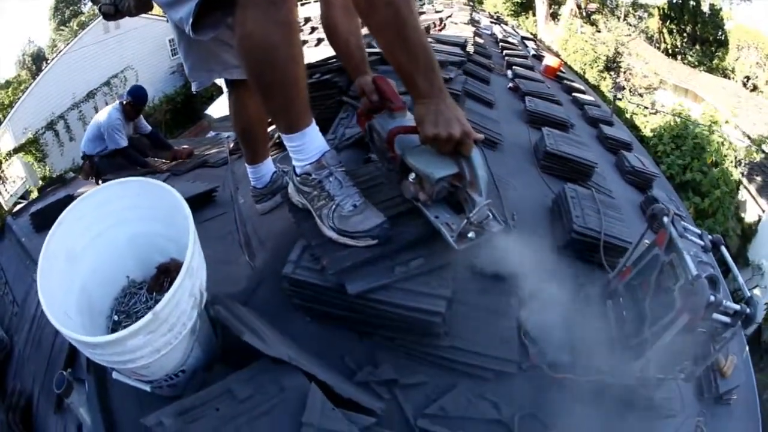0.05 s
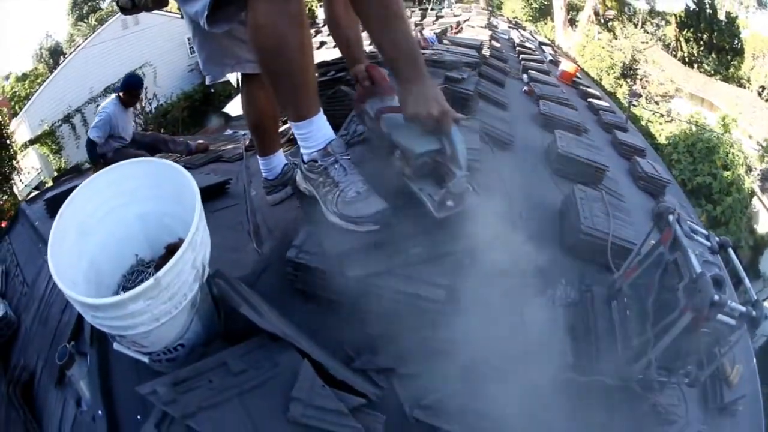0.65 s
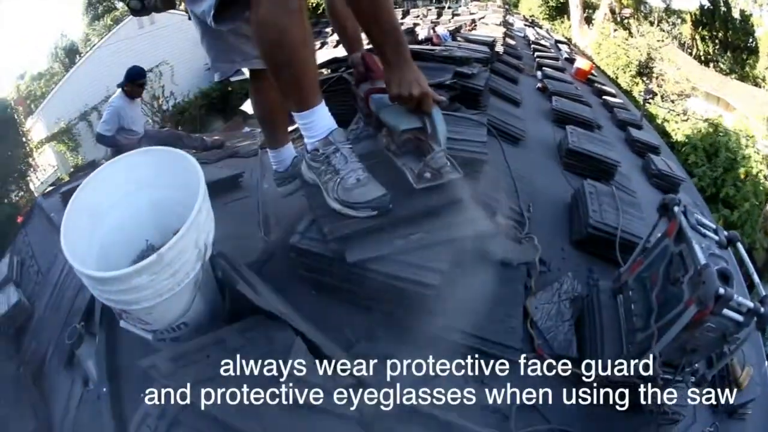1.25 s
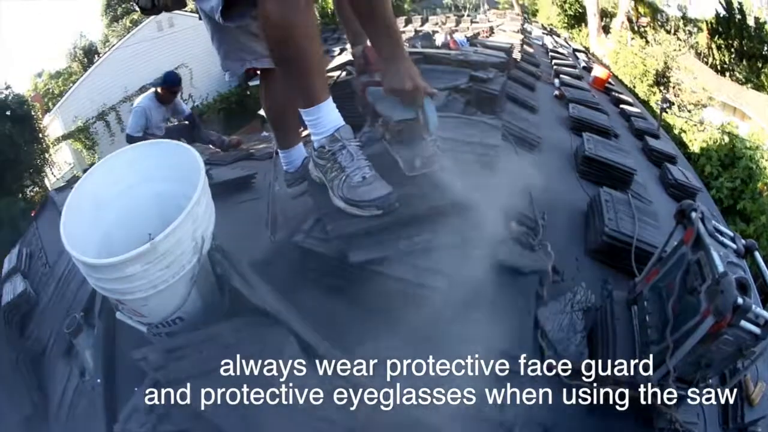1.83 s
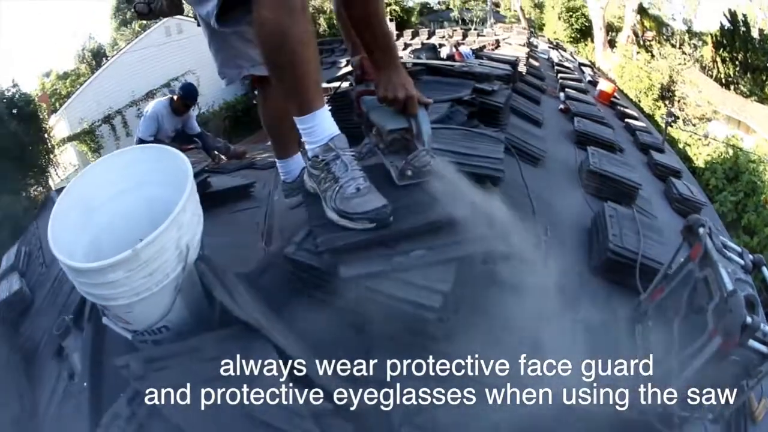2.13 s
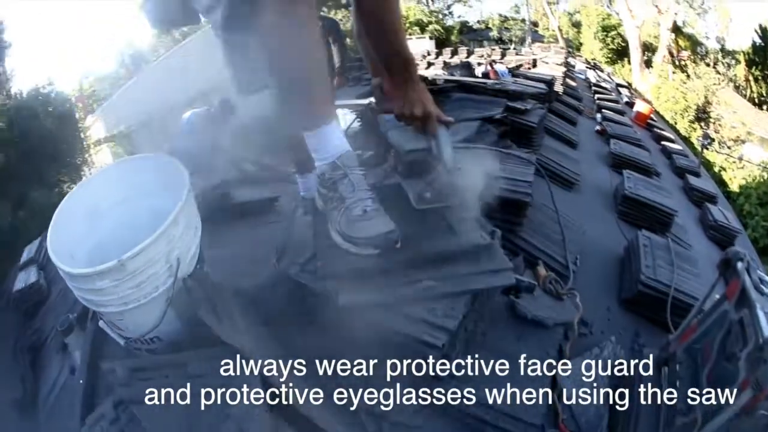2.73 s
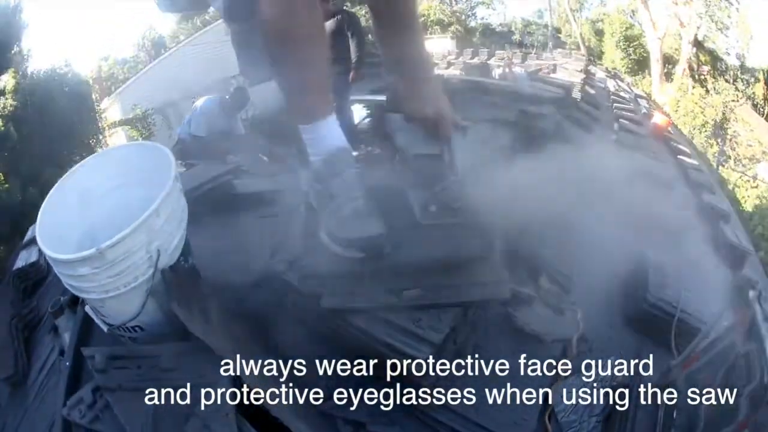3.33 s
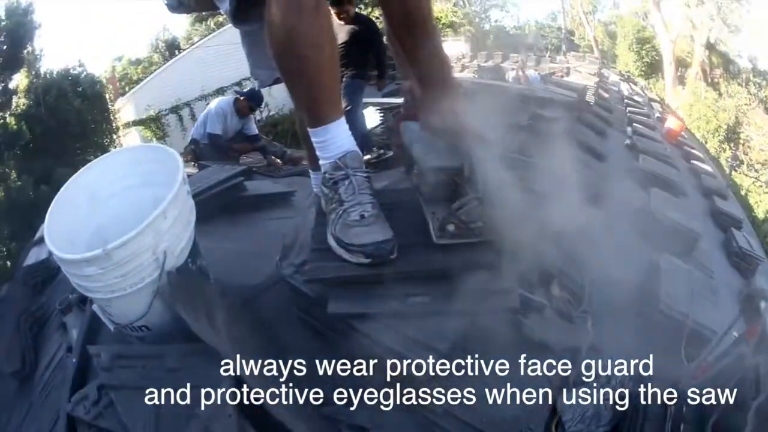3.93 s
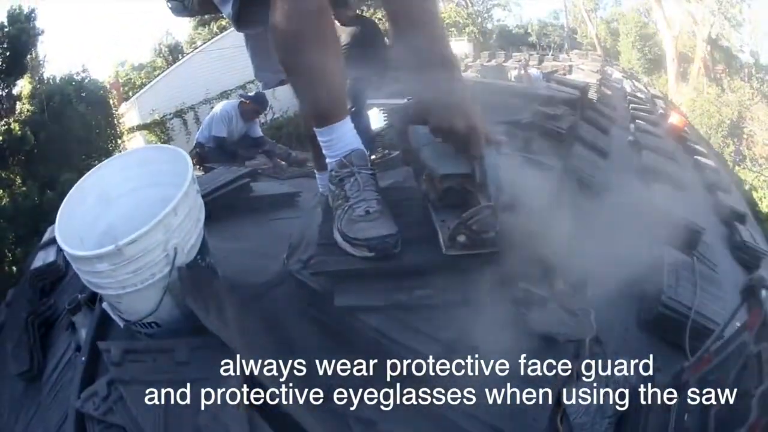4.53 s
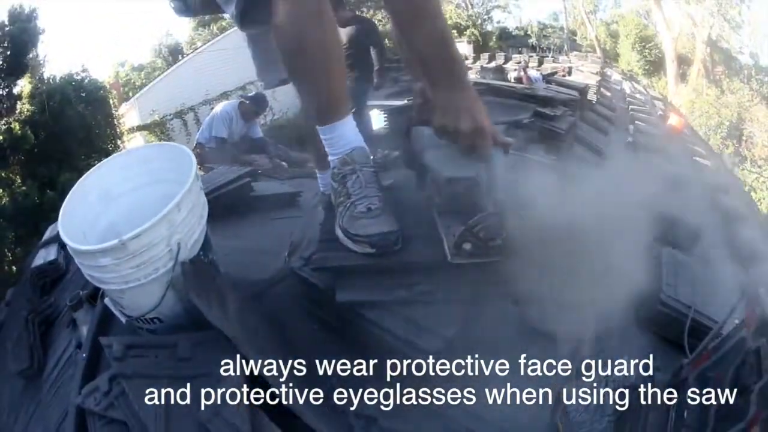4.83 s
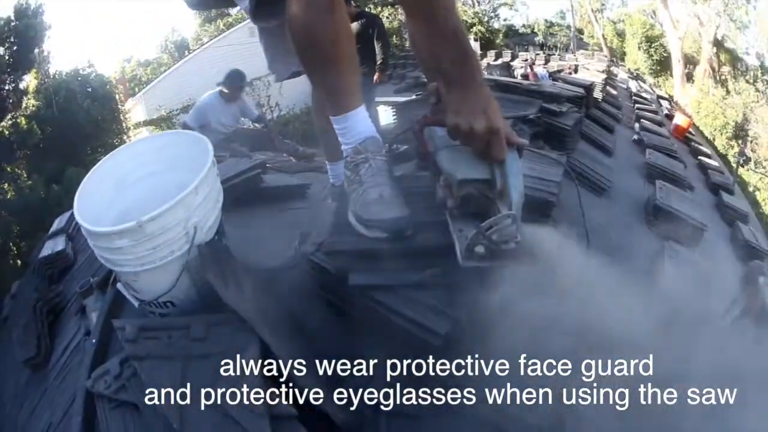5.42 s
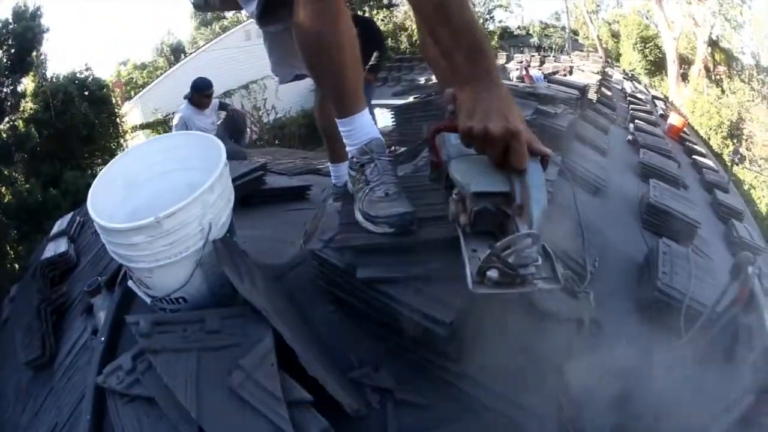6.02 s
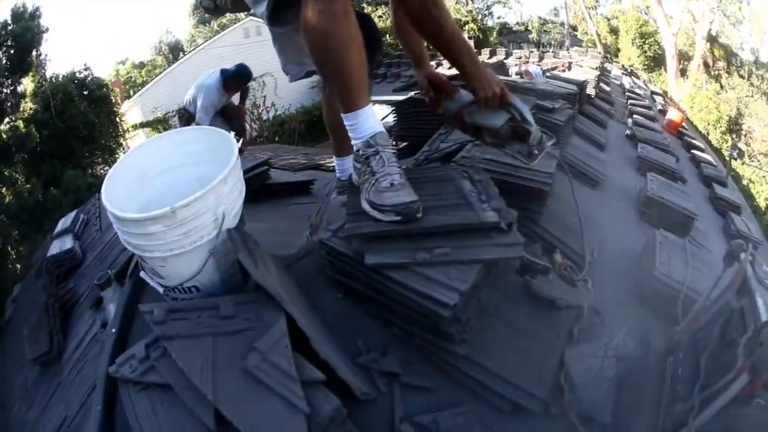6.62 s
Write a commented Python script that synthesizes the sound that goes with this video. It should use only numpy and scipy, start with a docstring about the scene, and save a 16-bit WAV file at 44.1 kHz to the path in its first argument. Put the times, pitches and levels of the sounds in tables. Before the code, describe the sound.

Outdoors, a circular saw grinds steadily through concrete tile, its piercing metallic shriek distorting the nearby microphone a little. Gritty rasping and wavering high tones run through the cut, broken by short, rough stutters as the blade catches. A few soft, dull thumps and low rumbles sit below. Finally the grinding stops, leaving rushing motor air and a whine that falls in pitch.

```python
"""Circular saw cutting a roof tile

A handheld saw's diamond blade cuts a concrete tile outdoors. Grit scrapes the kerf and rings the steel
disc, which sings now and then; the rim buzzes, sags under load and jams briefly. The blade comes free,
the trigger is let go and the motor whines down. The shriek overloads the microphone. Low rumbles and
short, dull thumps sound under the cut."""
import sys
import numpy as np
from scipy import signal
from scipy.fft import rfft, irfft, next_fast_len
from scipy.io import wavfile

SR = 44100
rng = np.random.default_rng(int(sys.argv[2]) if len(sys.argv) > 2 else 0)


def int16_out(signal):
    """Quantize to a 16-bit WAV file."""
    q = np.round(np.clip(np.atleast_2d(signal).T, -1, 1) * 32767)
    wavfile.write(sys.argv[1], SR, q.astype(np.int16))


N = 293997
TIME = np.arange(N) / SR
# the disc sinks in, reaches the far edge, is through, grazes the kerf, is lifted
SINK_S, EDGE_S, THROUGH_S, GRAZE_S, LIFT_S = 1.54, 5.42, 5.65, 5.85, 5.87


def undb(db):
    """Decibels to gain."""
    return 10 ** (np.asarray(db) / 20)


def unit(x):
    """Scale to rms 1."""
    return x / np.sqrt(np.mean(x ** 2))


def curve(table):
    """Join (time [s], value) points by straight lines."""
    return np.interp(TIME, *np.transpose(table))


def ramp(start_s, end_s):
    """Linear rise from 0 to 1."""
    return np.clip((TIME - start_s) / (end_s - start_s), 0, 1)


def since(start_s):
    """Seconds elapsed; 0 before the start."""
    return np.maximum(TIME - start_s, 0)


def swell(start_s, end_s, edge):
    """Rise and fall, each over the share `edge` of the span; one already under way only falls."""
    place = (TIME - start_s) / (end_s - start_s)
    rise = place if start_s > .02 else 1
    return np.clip(np.minimum(rise, 1 - place) / edge, 0, 1)


def walk(rate_hz):
    """Random drift, rate_hz new values a second; rms 1."""
    values = rng.standard_normal(4096)
    return unit(np.interp(TIME * rate_hz, np.arange(len(values)), values))


def colour(x, points):
    """Filter by (frequency [Hz], gain [dB]) points; rms 1."""
    hz, db = np.transpose(points)
    size = next_fast_len(N, True)
    bins_hz = np.maximum(np.arange(size // 2 + 1) * SR / size, 1)
    gain = undb(np.interp(np.log(bins_hz), np.log(hz), db))
    return unit(irfft(rfft(x, size) * gain, size)[:N])


def ring(x, hz, width_hz):
    """One damped mode driven by x; rms 1."""
    return unit(signal.lfilter(*signal.iirpeak(hz, hz / width_hz, SR), x))


def scrape(turns, wobble_db):
    """Grit impacts of uneven size; the disc runs out of true and bites harder once a turn."""
    return rng.standard_normal(N) * undb(wobble_db * np.sin(2 * np.pi * turns) + 1.5 * walk(400))


def rim_pattern(turns, points=768):
    """The same diamonds meet the tile every turn, so part of the scrape repeats."""
    marks = signal.resample(rng.standard_normal(points), 8 * points)
    return unit(np.interp(turns % 1, np.linspace(0, 1, len(marks)), marks))


def blade(bite, depth, wander_db=1.83, flutter_db=2.0, kerf_damping=1.66):
    """Disc modes waver as the contact point moves; the kerf walls damp them and shift their balance."""
    # steel disc modes: (frequency [Hz], free width [Hz], shallow level [dB], buried level [dB])
    modes = [(630, 29, -41.5, -49.5), (1138, 14, -41.5, -52), (1282, 56, -37.5, -44), (1912, 87, -30, -36),
             (2592, 157, -31, -26.5), (3165, 89, -26.5, -38), (3457, 32, -29, -31), (4045, 150, -28.5, -24),
             (4219, 30, -31, -25.5), (4480, 63, -26.5, -29.5), (4740, 47, -26.5, -31), (5097, 32, -26, -30),
             (5330, 24, -31, -44), (5591, 71, -23, -20.5), (6110, 66, -25, -28.5), (6294, 77, -29.5, -24),
             (6670, 49, -18.5, -31), (6780, 34, -25, -24), (7290, 37, -28.5, -26),
             (7580, 130, -28.5, -28.5), (7790, 92, -31, -25), (8123, 57, -23.5, -23), (8634, 86, -32, -33),
             (8960, 92, -28.5, -27), (9576, 160, -27, -30), (10110, 21, -37, -36), (10600, 51, -42, -37),
             (11100, 45, -39, -37.5), (11400, 71, -36.5, -36.5), (12600, 63, -36, -45),
             (13400, 62, -46, -53)]
    out = 0
    for hz, width_hz, shallow_db, buried_db in modes:
        push = np.roll(bite, rng.integers(N))
        shallow = undb(shallow_db) * ring(push, hz, width_hz)
        buried = undb(buried_db) * ring(push, hz, width_hz * kerf_damping)
        waver = undb(wander_db * walk(5) + flutter_db * walk(22))
        out += ((1 - depth) * shallow + depth * buried) * waver
    return out


def buzzing(turns, rim_db=-44.5, chatter_db=-3.0):
    """The uneven rim drums on the tile at multiples of the turn rate; some flare up as chatter."""
    # rim lines: (multiple of turn rate, level [dB])
    rim_lines = [(12, -3), (15, -1.5), (16, -3), (19, -2.5), (21, -1), (23, 1), (25, -11), (26, -2),
                 (28, 0), (31, 3.5), (33, 1.5), (38, 3), (47, 8)]
    # chatter spells: (start [s], length [s], multiple of turn rate, level [dB])
    spells = [(0, .7, 31, -25), (0, .5, 19, -32), (0, .55, 11, -35), (.2, .55, 55, -29), (.65, .5, 14, -36),
              (1.0, .62, 33, -26), (1.05, .55, 34, -26), (1.85, .53, 31, -31), (1.9, .48, 47, -25),
              (3.95, 1.0, 27, -31), (4.15, .9, 12, -39)]

    def line(multiple):
        """Slightly unsteady tone; rms 1."""
        return np.sqrt(2) * np.sin(2 * np.pi * (multiple * turns + rng.random()) + 0.28 * walk(40))

    rim = sum(undb(db + 1.8 * walk(4)) * line(multiple) for multiple, db in rim_lines)
    chatter = sum(undb(db + 2 * walk(25)) * swell(start_s, start_s + length_s, edge=0.16) * line(multiple)
                  for start_s, length_s, multiple, db in spells)
    return undb(rim_db) * rim + undb(chatter_db) * chatter


def cutting(turns, usual_feed_db=-29, sink_tau_s=1.0, unload_s=.06, lift_db_per_s=135):
    """The rim grinds the tile: feed sets the level, depth the disc's ring; it eases once through."""
    # push on the saw: (time [s], level [dB])
    feed = [(0.0, -30), (0.14, -28), (1.61, -28.5), (2.05, -25.5), (2.57, -34.5), (2.83, -29.5),
            (3.93, -28.5), (4.02, -27.5), (5.62, -29.5)]
    # grit hiss spectrum: (frequency [Hz], gain [dB])
    grit_spectrum = [(1200, -17), (2500, -6), (3800, -2), (5000, -6), (7500, 0), (8400, -4.5),
                     (9200, -12.5), (11000, -13), (13500, -31), (15600, -53)]
    # spectrum of the tile's low rasp: (frequency [Hz], gain [dB])
    rasp_spectrum = [(25, -45), (60, -32), (150, -8.5), (400, -2.5), (800, -2), (1400, 3), (2400, -3.5),
                     (4000, -27), (9000, -48)]
    feed_db = curve(feed) - usual_feed_db
    sunk = 1 - np.exp(-since(SINK_S) / sink_tau_s)
    depth = sunk * (1 - 0.77 * ramp(EDGE_S, THROUGH_S))
    through = ramp(THROUGH_S, THROUGH_S + unload_s)
    graze_db = 4 * np.exp(-((TIME - GRAZE_S) / 0.052) ** 2)
    contact_db = graze_db - lift_db_per_s * since(LIFT_S)
    scrape_db = -1 + .2 * feed_db - 3.5 * through + contact_db
    load_db = -9.5 * through + contact_db
    bite = scrape(turns, wobble_db=1.16) + 0.67 * rim_pattern(turns)
    steel = blade(bite, depth) * undb(scrape_db)
    grit = colour(bite, grit_spectrum) * undb(scrape_db - 19.5 + 2.7 * walk(14))
    rasp = colour(scrape(turns, wobble_db=2.0), rasp_spectrum) * undb(feed_db + load_db - 29)
    buzz = buzzing(turns) * undb(load_db)
    return steel + grit + rasp + buzz


def singing(attack_s=0.067, release_s=0.058):
    """Friction feeds one mode of disc or tile: a narrow, unsteady tone builds up and rings away."""
    # singing modes: (start [s], time driven [s], pitch [Hz], width [Hz], level [dB])
    sings = [(0, 0.28, 4760, 23, -24), (0, .4, 5226, 29, -22.5), (.3, 1.25, 5574, 20, -23),
             (.6, 0.13, 2570, 62, -22), (.7, 1.1, 5014, 11, -27.5), (.95, .55, 8150, 54, -24),
             (0.998, 1, 6820, 25, -19.5), (1.35, 1.28, 6660, 48, -20.5), (2.2, 0.31, 6300, 45, -30),
             (2.35, .4, 4500, 27, -27), (2.65, 0.6, 6860, 60, -19.5), (3.1, 0.76, 8060, 170, -22),
             (3.2, 1.05, 5550, 50, -25.5), (4.0, .5, 4270, 80, -24.5), (4.5, 0.34, 4500, 110, -22),
             (4.8, 0.23, 4650, 92, -22), (5.03, 0.3, 2617, 70, -29.5), (5.482, .25, 4136, 30, -21.5),
             (5.53, 0.076, 732, 36, -32), (5.58, 0.14, 2620, 53, -25), (5.66, 0.28, 5550, 13, -26.5),
             (5.78, 0.089, 6660, 17, -23), (5.798, 0.086, 6300, 11, -21)]
    out = np.zeros(N)
    for start_s, driven_s, hz, width_hz, db in sings:
        attack = ramp(start_s, start_s + attack_s) if start_s > .02 else 1
        envelope = attack * np.exp(-since(start_s + driven_s) / release_s)
        on = envelope > 1e-3
        pole = np.exp(-np.pi * width_hz / SR)
        slow_noise = signal.lfilter([1 - pole], [1, -pole], rng.standard_normal((2, N))[:, on])
        phasor = slow_noise[0] + 1j * slow_noise[1]
        phasor /= np.sqrt(np.abs(phasor))  # friction saturates, steadying the level
        tone = np.real(phasor * np.exp(2j * np.pi * hz * TIME[on]))
        out[on] += undb(db) * envelope[on] * unit(tone)
    return out


def motor(turn_hz, gear_ratio=16 / 3, free_turn_hz=52.8, air_db_per_octave=20.5, whine_db_per_octave=23):
    """Cooling air rushes through the housing; gear teeth and fan blades whine at shaft-rate multiples."""
    # gear and fan lines: (multiple of shaft rate, level [dB])
    whine_lines = [(3, -19.5), (6, -13), (12, 0), (16, -12), (32, -19), (48, -37.5)]
    # housing resonances that lift a passing line: (frequency [Hz], width [Hz], boost [dB])
    housing = [(7620, 350, 22), (3730, 90, 9)]
    # cooling air spectrum: (frequency [Hz], gain [dB])
    air_spectrum = [(25, -19.5), (70, -26), (300, -24.5), (800, -13.5), (1200, -14), (1700, -7.5),
                    (2700, -1.5), (3600, -4.5), (5500, -5.5), (8300, -12), (9600, -23), (12000, -29),
                    (15600, -43)]
    shaft_hz = gear_ratio * turn_hz
    phase = 2 * np.pi * np.cumsum(shaft_hz * (1 + 0.0041 * walk(220))) / SR
    whine = 0
    for multiple, db in whine_lines:
        boost_db = sum(peak_db / (1 + (2 * (multiple * shaft_hz - hz) / width_hz) ** 2)
                       for hz, width_hz, peak_db in housing)
        whine += np.sqrt(2) * np.sin(multiple * phase) * undb(db + boost_db + 2.2 * walk(90))
    air = colour(rng.standard_normal(N), air_spectrum) * undb(.5 * walk(30))
    octaves = np.log2(turn_hz / free_turn_hz)
    in_cut_db = -9 * (1 - ramp(THROUGH_S, LIFT_S))
    air_db = -22 + air_db_per_octave * octaves + in_cut_db
    whine_db = -29 + whine_db_per_octave * octaves + in_cut_db
    return undb(air_db) * air + undb(whine_db) * whine


def distant_hum():
    """Something hums faintly far off, wavering in level and phase."""
    # hum tones: (frequency [Hz], level [dB])
    tones = [(167, -58.5), (727, -54)]
    return sum(undb(db + 2 * walk(10)) * np.sqrt(2) * np.sin(2 * np.pi * hz * TIME + 0.95 * walk(13))
               for hz, db in tones)


def chewing(turns):
    """The jammed rim hammers the tile once a turn."""
    # jams: (start [s], end [s], level [dB])
    jams = [(1.961, 2.001, -21), (2.012, 2.098, -20), (2.16, 2.27, -25.5), (2.288, 2.318, -16.5),
            (3.212, 3.334, -22.5), (5.43, 5.683, -25)]
    # jam spectrum: (frequency [Hz], gain [dB])
    jam_spectrum = [(60, -17), (500, -11), (1200, -1.5), (1700, 1.5), (2500, 5.5), (3200, -8), (6000, -21),
                    (12000, -40)]
    force = sum(undb(db) * swell(start_s, end_s, edge=0.14) for start_s, end_s, db in jams)
    return force * colour(scrape(turns, wobble_db=2.5), jam_spectrum)


def rumbles_and_thumps():
    """Bursts of bass noise: low rumbles and short, dull thumps."""
    # bursts: (time [s], half-length [s], level [dB])
    bursts = [(2.085, 0.06, -31), (2.21, 0.05, -31), (3.354, .2, -37), (4.1, .015, -39), (4.898, .02, -34)]
    # burst spectrum: (frequency [Hz], gain [dB])
    burst_spectrum = [(20, -16), (50, -10), (100, 0), (170, -8), (300, -10), (800, -45)]
    envelope = sum(undb(db) * np.exp(-((TIME - at_s) / half_s) ** 2) for at_s, half_s, db in bursts)
    return envelope * colour(rng.standard_normal(N), burst_spectrum)


def scene(trigger_off_s=5.98, coast_tau_s=3.32, cut_db=2.5):
    """Cut, motor and surroundings, the same in both channels."""
    # blade speed, sagging under load, recovering once free: (time [s], turn rate [Hz])
    speed = [(0, 57.9), (.3, 57.7), (.85, 53.9), (1.48, 55.8), (1.8, 52.2), (2.17, 52.4), (2.4, 50.1),
             (2.7, 55.2), (2.9, 54.6), (3.45, 47), (4.4, 49.3), (5.15, 48.6), (5.55, 46.7), (5.8, 47.9),
             (5.93, 52.8)]
    turn_hz = curve(speed) * np.exp(-since(trigger_off_s) / coast_tau_s)
    turns = np.cumsum(turn_hz * (1 + 0.002001 * walk(30))) / SR
    cut = cutting(turns) + singing() + chewing(turns)
    sound = undb(cut_db) * cut + motor(turn_hz) + distant_hum() + rumbles_and_thumps()
    return np.array([sound, sound])


def record(dry, ceiling_db=-8.5, low_cut_hz=80, high_cut_hz=15500):
    """The microphone stage flattens the peaks; deep bass and top are cut."""
    oversampled = signal.resample_poly(dry, 3, 1, axis=1) / undb(ceiling_db)
    clipped = oversampled / (1 + oversampled ** 4) ** .25
    sound = signal.resample_poly(clipped, 1, 3, axis=1) * undb(ceiling_db)
    sound = signal.sosfilt(signal.butter(2, low_cut_hz, "high", fs=SR, output="sos"), sound)
    return signal.sosfilt(signal.ellip(12, .1, 80, high_cut_hz, fs=SR, output="sos"), sound)


dry = scene()
out = record(dry)
int16_out(out)
```